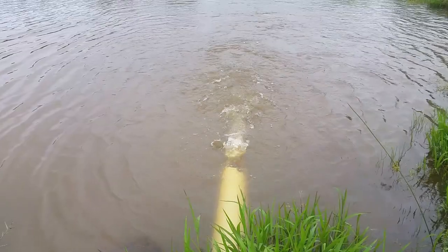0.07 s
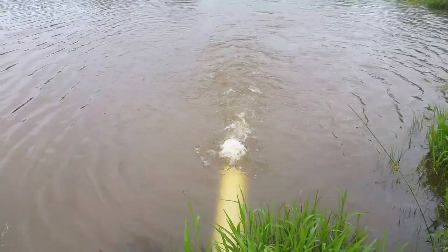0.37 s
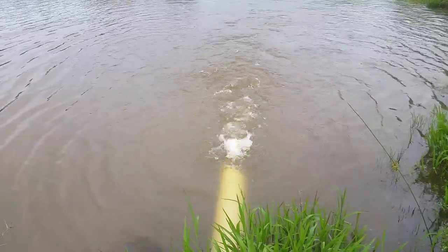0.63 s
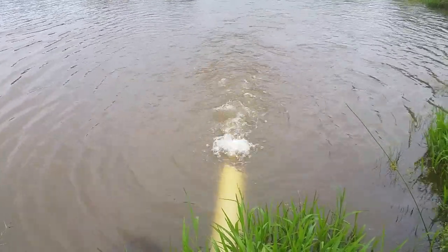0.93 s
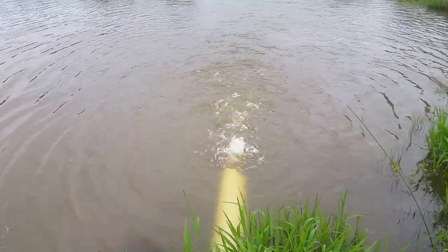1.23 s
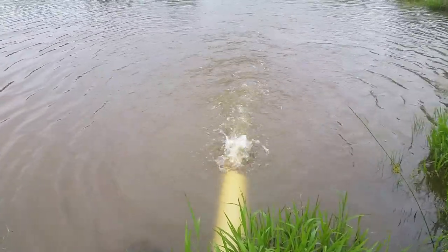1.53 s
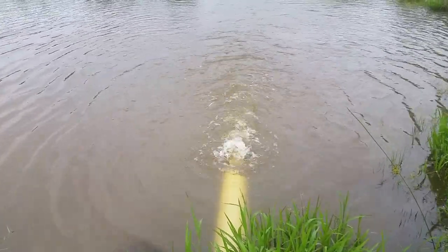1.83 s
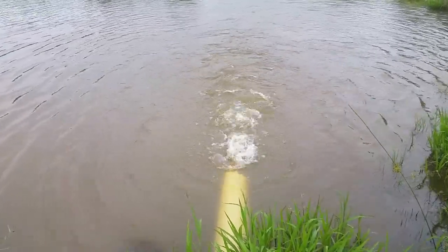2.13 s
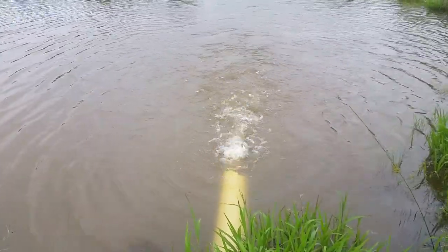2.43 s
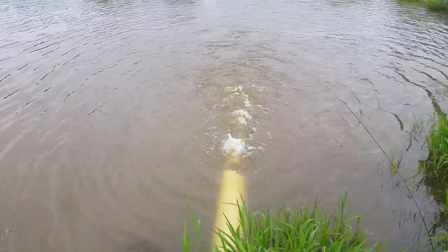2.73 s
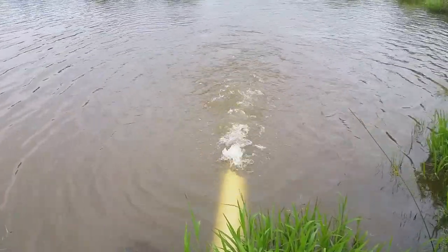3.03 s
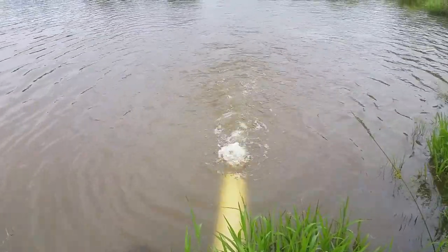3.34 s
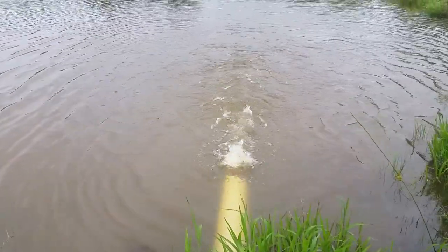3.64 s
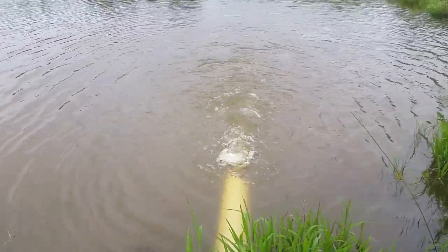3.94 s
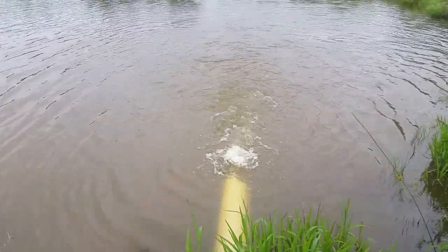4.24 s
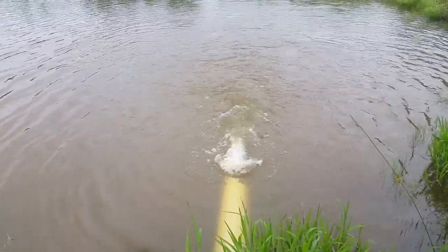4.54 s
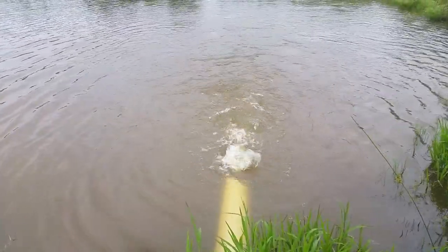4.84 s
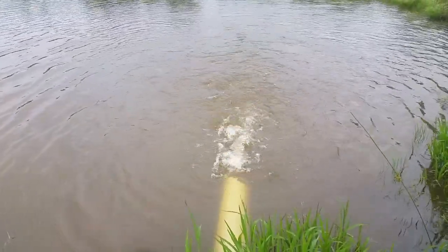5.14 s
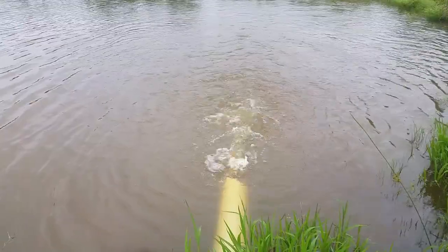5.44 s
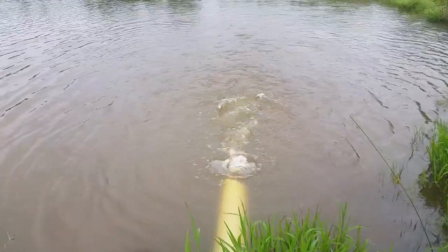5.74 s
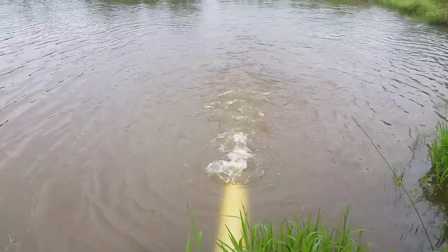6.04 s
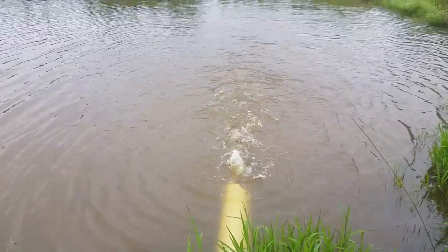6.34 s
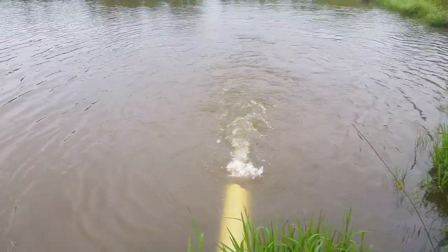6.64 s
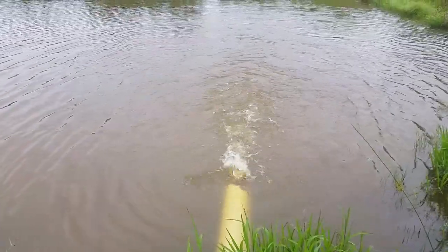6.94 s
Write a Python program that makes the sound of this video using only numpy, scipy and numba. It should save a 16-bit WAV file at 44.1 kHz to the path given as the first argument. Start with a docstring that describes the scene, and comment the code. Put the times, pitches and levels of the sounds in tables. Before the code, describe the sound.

Water and trapped air pour from a half-sunk pipe into a pond, making a continuous churning burble. Low, rounded glugs come a few times a second in uneven clusters, mixed with small plops and slops of falling water. Fine spray patters and foam fizzes above it, with an occasional sharp drip. The microphone is a couple of metres away outdoors, and a light breeze bumps it now and then.

```python
"""Pipe gushing into a pond

Water and trapped air leave a half-sunk pipe a couple of metres from a hand-held microphone.
Air pockets gulp at the mouth, resonating at a pitch that rises as they close. The jet churns up
clouds of ringing bubbles, heaved-up water slops back, spray patters on the surface and foam fizzes.
The bank returns a faint echo, and a light breeze buffets mainly the left microphone port."""
import sys
import numpy as np
from scipy import signal
from scipy.fft import rfft, irfft, next_fast_len
from scipy.io import wavfile
from scipy.ndimage import uniform_filter1d
from numba import njit

SR = 44100
rng = np.random.default_rng(int(sys.argv[2]) if len(sys.argv) > 2 else 0)


def bounce(signal):
    """Save signal as a 16-bit WAV file at the path given by the first command-line argument."""
    frames = np.transpose(np.atleast_2d(signal))
    limited = np.clip(frames, -1, 1)
    pcm = np.round(limited * 32767).astype(np.int16)
    wavfile.write(sys.argv[1], SR, pcm)


N = 316638
TIME = np.arange(N) / SR

# Levels are relative within each table; build and decay are time constants of amplitude.
# air pockets breaking from the mouth: t/s, f/Hz, level/dB, build/s, decay/s, rise/(octave/s)
AIR_POCKETS = [(0.01, 226, -32.5, 0.012, 0.01, 2.7), (0.288, 204, -19.5, 0.0016, 0.01, 16),
               (0.306, 250, -25.5, .006, 0.029, 11), (0.336, 308, -20.5, 0.0017, 0.0036, 8.8),
               (0.517, 186, -20, 0.0032, 0.0033, 13), (0.536, 228, -31, 0.0026, 0.0044, 8.8),
               (0.603, 370, -29, 0.0062, 0.0078, 9.6), (0.703, 116, -27.5, 0.002, 0.01, 4.4),
               (0.732, 192, -24, 0.0066, 0.011, 7.9), (0.756, 200, -21.5, 0.0024, 0.0039, 8),
               (0.784, 284, -25, 0.0029, 0.0069, 11), (0.811, 318, -18, 0.001, 0.0074, 7.1),
               (0.99, 221, -27, 0.0023, 0.002, 10), (1.018, 275, -20, 0.015, 0.0055, 14),
               (1.04, 327, -19, .002, 0.0018, 10), (1.24, 287, -13.5, 0.0025, 0.0041, 6),
               (1.259, 300, -23, 0.0068, .011, 24), (1.306, 440, -31, 0.02, 0.016, 2.2),
               (1.429, 290, -25, 0.0012, 0.013, 2.4), (1.488, 109, -24, 0.0033, 0.0074, 8),
               (1.527, 182.7, -19, 0.019, 0.016, 9.9), (1.68, 135, -28, 0.0063, 0.0083, 5),
               (1.787, 160, -24.5, 0.012, 0.02, 6.8), (1.84, 193, -30, .008, 0.016, 5.9),
               (1.86, 314, -19, 0.00068, 0.014, 7.8), (1.899, 506, -31.5, 0.048, 0.015, 22),
               (2.087, 120, -23.5, 0.0049, .008, 20), (2.102, 198, -24, .003, 0.01, 18),
               (2.151, 229, -23.5, 0.0056, .004, 12), (2.173, 313, -25.5, 0.0064, 0.0073, 9.5),
               (2.433, 205, -22, 0.0034, 0.0033, 11), (2.459, 199, -25, 0.002, 0.0036, 8),
               (2.472, 220, -18, 0.0025, 0.0081, 7.6), (2.49, 259, -27, 0.0035, 0.022, 7.1),
               (2.664, 170, -20, 0.0027, 0.011, 9.6), (2.677, 212, -20.5, 0.0021, 0.0072, 11),
               (2.702, 360, -22, 0.0036, 0.0033, 7), (2.948, 310, -26.5, 0.0083, 0.02, 4),
               (2.977, 291, -21.5, 0.0026, 0.0084, 9), (3.151, 271, -20, 0.0031, 0.0048, 17),
               (3.24, 233, -24, 0.003, 0.0014, 8), (3.314, 130, -30, 0.0033, 0.0065, 8),
               (3.462, 216, -20.5, 0.0042, .007, 16), (3.475, 316, -20, 0.0073, 0.0078, 7.7),
               (3.489, 338, -20, 0.0055, 0.0078, 9.8), (3.76, 232, -23.5, 0.012, 0.016, 9),
               (4.031, 151, -24.5, 0.02, 0.01, 17), (4.073, 220, -18.5, 0.0017, 0.0041, 17),
               (4.094, 342, -31, 0.022, 0.016, 13), (4.236, 140, -32, .001, .003, 5),
               (4.258, 134, -18, .002, .004, 3), (4.319, 261, -18.5, 0.01, 0.012, 5.2),
               (4.347, 292, -21, 0.0089, 0.016, 4.1), (4.538, 196, -20.5, 0.00057, 0.0033, 5),
               (4.555, 188, -26, .001, 0.0033, 5), (4.621, 355, -26, 0.0048, 0.0063, 15),
               (4.645, 268, -27, 0.003, 0.0055, 47), (4.904, 159, -27, 0.0062, 0.0059, 15),
               (4.923, 290, -23.5, 0.0028, 0.022, 9.1), (5.204, 199, -31.5, 0.013, 0.015, 4.9),
               (5.247, 410.4, -33.5, 0.033, 0.033, 28.4), (5.433, 133, -28, 0.0033, 0.026, 16),
               (5.459, 268, -26.5, 0.0075, 0.016, 15.3), (5.768, 57, -22, 0.018, 0.0052, 5),
               (5.8, 169, -16, 0.014, 0.016, 9.3), (5.899, 299, -31, 0.015, 0.027, 9.2),
               (6.064, 147, -26.5, 0.0081, 0.0083, 16), (6.088, 223, -20, 0.0053, 0.004, 18),
               (6.115, 346, -28, 0.0058, 0.0099, 24), (6.234, 140, -31, .002, 0.0033, 5),
               (6.294, 366, -27.5, .003, .009, 3.6), (6.323, 210, -19.5, 0.0068, 0.0074, 15),
               (6.337, 328, -19, 0.01, 0.012, 4.8), (6.507, 210, -25.5, 0.0036, 0.01, 36),
               (6.532, 280, -28.5, 0.015, 0.035, 9), (6.616, 216, -34, 0.0086, 0.0085, 30),
               (6.671, 288, -28.5, 0.017, 0.022, 17), (6.86, 164, -25, 0.007, 0.017, 12),
               (6.874, 267, -23, 0.0015, 0.0073, 8.2)]
# single bubbles that stand out of the splash: t/s, f/Hz, level/dB, decay/s, rise/(octave/s)
SINGLE_BUBBLES = [(0.263, 740, -32.5, 0.0093, -1), (0.339, 785, -26.5, 0.0036, 4),
                  (0.343, 2130, -30, 0.0075, 3), (0.628, 685, -28.5, 0.0041, 1),
                  (0.843, 1080, -34, 0.0073, 8), (1.158, 1370, -27, 0.0015, 8), (1.243, 540, -29, 0.01, 49),
                  (1.296, 843, -29.5, 0.0074, 10.5), (1.44, 630, -37, 0.013, 37),
                  (1.562, 1180, -31.5, 0.0067, 8), (1.655, 2100, -30, .0038, 4),
                  (1.722, 640, -29.5, .005, 15), (1.858, 890, -21.5, 0.0013, 8),
                  (2.04, 1050, -23, 0.0031, 12), (2.256, 680, -30, 0.0067, 5),
                  (2.282, 690, -31, 0.014, 0.5), (2.419, 690, -27, .004, 46),
                  (2.474, 1080, -32.5, 0.0065, -12), (2.511, 730, -29, .003, 29),
                  (2.528, 740, -30, .005, -8), (2.953, 1790, -25, .001, 4), (3.243, 630, -28, 0.005, -2),
                  (3.32, 574, -32.5, 0.014, 15.5), (3.508, 1170, -27, 0.0032, -4),
                  (3.663, 785, -24, 0.002, 8), (3.768, 754, -30.5, 0.007, 12),
                  (3.884, 2100, -32.5, 0.0067, 7), (4.067, 804, -31, 0.012, 3.5),
                  (4.185, 1590, -32.5, .0038, 5), (4.311, 1000, -24, 0.0015, 6),
                  (4.538, 600, -28, 0.0091, 1), (4.622, 705, -29, 0.0061, 2), (4.648, 630, -25, 0.0026, 13),
                  (4.94, 1185, -31, 0.0087, 1), (5.647, 1320, -28, 0.0024, 9),
                  (5.708, 2180, -30.5, 0.0026, 5), (5.712, 3470, -40, 0.0014, 12),
                  (6.098, 1340, -26, 0.0044, 7), (6.255, 870, -34.5, 0.01, 36), (6.405, 590, -28, 0.012, 5),
                  (6.692, 632, -26.5, 0.012, 11.5)]
# slow drift of the jet: t/s, splash level/dB, share of small bubbles/dB, spray level/dB
JET_DRIFT = [(0.0, -50, -4.5, -61.5), (0.45, -49, -5.5, -56), (0.88, -46.5, -3.5, -55),
             (1.3, -47, -2.5, -54), (1.5, -47.5, -3.5, -54), (1.8, -44, -6, -51),
             (2.25, -45.5, -5.5, -56.5), (2.7, -46.5, -4, -54.5), (3.35, -47.5, -5, -53),
             (3.72, -45, -5.5, -50.5), (4.1, -48.5, -5, -56), (4.4, -45, -7.5, -55), (4.58, -50, -7.5, -56),
             (5.12, -43, -3, -50), (5.68, -50.5, -2.5, -56.5), (6.35, -49, -5.5, -56),
             (6.75, -43.5, -3.5, -50.5), (7.18, -49.5, -2.5, -56.5)]
# heaved-up water falling back: t/s, level/dB, decay/s, share of small bubbles/dB
WATER_SLOPS = [(0.346, -42.5, 0.027, -5), (0.46, -47, 0.02, -6), (0.645, -46, 0.052, -3),
               (0.84, -39, 0.018, -15), (1.0, -43, 0.018, -19), (1.154, -47, 0.022, -0.5),
               (1.25, -47, 0.039, -16), (1.33, -41, 0.081, -2.5), (1.66, -47, 0.16, -15),
               (1.875, -38.5, 0.012, -8), (2.16, -44.5, 0.12, -5), (2.27, -45.5, 0.081, -7),
               (2.526, -45.5, 0.048, -8), (2.956, -41, 0.016, -14), (3.025, -41, 0.032, -8),
               (3.325, -56, 0.011, 7.5), (3.42, -55, .02, 9), (3.55, -51.5, 0.16, -1),
               (3.68, -58, .025, -7), (3.801, -40, 0.042, -25), (4.165, -44.5, 0.0085, -7),
               (4.32, -44, 0.008, -4), (4.68, -41.5, 0.039, -5.5), (5.245, -39, 0.022, -11),
               (5.46, -44, 0.036, -19), (5.85, -47, 0.23, -7), (6.115, -44, 0.066, -9),
               (6.69, -40, 0.038, -14)]
# surges of the churning as pockets work their way out: t/s, level/dB
CHURN_SURGES = [(0.28, -45.5), (0.47, -46), (0.54, -47), (0.78, -44), (1.01, -41), (1.24, -45.5),
                (1.44, -44), (1.84, -48), (2.15, -43), (2.45, -45), (2.59, -47.5), (2.67, -40.5),
                (2.97, -47), (3.24, -37.5), (3.47, -55), (3.77, -39), (4.05, -48), (4.31, -44),
                (4.63, -40.5), (4.91, -41.5), (5.47, -39.5), (6.08, -47.5), (6.31, -45), (6.64, -39.5),
                (6.87, -44.5)]
# large drops striking the pond: t/s, level/dB, band centre f/Hz
DROP_IMPACTS = [(0.143, -28.5, 9860), (0.596, -37, 14400), (0.753, -30, 15000), (1.174, -24, 14000),
                (1.273, -32, 13400), (1.821, -23, 14500), (2.545, -34, 13500), (2.698, -27, 14200),
                (3.233, -30, 12000), (3.312, -29, 10940), (3.327, -32, 11000), (3.536, -26, 14900),
                (3.561, -25, 14600), (3.574, -31, 14800), (3.593, -26, 9710), (3.651, -20, 13900),
                (3.711, -31, 14000), (4.314, -26, 9600), (4.449, -30, 9900), (4.68, -28, 14500),
                (5.162, -18, 15000), (5.71, -27.5, 14000), (6.096, -28.5, 9800), (6.217, -27, 13200),
                (6.694, -24, 14500), (7.031, -20.5, 12600)]
# showers of droplets: t/s, level/dB, decay/s
DROPLET_SHOWERS = [(0.14, -54, 0.018), (1.175, -46, 0.022), (3.32, -51, .031), (3.59, -45.5, 0.01)]
# pinhead bubbles left by drops: t/s, f/Hz, level/dB
PINHEAD_BUBBLES = [(0.118, 4510, -34), (0.136, 5360, -28), (0.678, 4970, -30), (0.748, 4720, -36),
                   (1.972, 4600, -35), (2.683, 4920, -33), (3.204, 4870, -34), (3.245, 4620, -34),
                   (4.36, 5000, -31), (4.446, 5500, -28.5), (4.995, 5300, -30), (6.096, 4300, -33),
                   (7.024, 5640, -32)]
# gusts on the microphone: t/s, build and decay/s, left level/dB, right level/dB
PORT_GUSTS = [(1.45, 0.096, -38.5, -57), (1.71, 0.087, -34.5, -43.5), (2.028, 0.14, -37, -45),
              (2.38, 0.031, -38.5, -64), (3.31, 0.01, -59, -25.5), (3.468, 0.011, -64, -29),
              (3.91, 0.25, -66, -38.5), (4.826, 0.017, -56, -30.5), (5.567, 0.17, -32, -56),
              (5.776, 0.034, -24, -35), (6.185, 0.11, -34, -35), (7.134, 0.33, -37.5, -51)]
# balance as the hand turns a little: t/s, left minus right level/dB
MICROPHONE_AIM = [(0.0, 1.5), (0.52, 0), (7.18, 0.5)]
# spectrum of the bubble cloud, rippled by its reflection off the pond: f/Hz, level/dB
SPLASH_SPECTRUM = [(300, 12.5), (480, -10), (640, -2), (900, -8), (1150, -5), (1550, -11.5), (1780, -7),
                   (2100, -7), (2400, -14), (2800, -21.5), (3200, -42), (4500, -73), (7000, -90)]
# spectrum of water shoved aside by a gulp: f/Hz, level/dB
THUMP_SPECTRUM = [(20, -23), (45, -17), (85, 4), (130, 11.5), (200, 2.5), (500, -30)]
# spectrum of the churning under the jet: f/Hz, level/dB
CHURN_SPECTRUM = [(25, -12), (50, 8), (90, 2), (170, 4), (300, 0), (390, 0.5), (480, -18), (700, -85)]
# spectrum of the spray at the two ports: f/Hz, left level/dB, right level/dB
SPRAY_SPECTRUM = [(3100, -17, -27), (3700, -12, -22), (4300, -1, -16.5), (5400, -2, -18), (6100, -13, -22),
                  (7000, -18, -24), (7700, -36, -37), (8600, -16, -19), (9900, -8, -10.5),
                  (10600, -13, -12), (11500, -11, -9), (12600, -14, -14), (13800, -5, -6), (15600, -7, -5)]
# spectrum of eddies on a port: f/Hz, level/dB
BREEZE_SPECTRUM = [(15, -22), (30, -9), (52, -7.5), (90, 0.5), (160, -20.5), (400, -38), (1500, -75)]


def gulps(boom_db=-2.9, shred_db=-11.5, slap_db=-21, thump_db=-3, wobble_s=.0004, shred_octaves=.7):
    """Bubble resonance: each air pocket booms, sheds shreds of air and displaces the water around it."""
    t, hz, db, build, decay, rise = np.transpose(AIR_POCKETS).copy()
    phase, shred_phase, spread, late = rng.random((len(t), 4)).T.copy()
    boom = bubbles(t, hz, undb(db + boom_db), build, decay, rise, phase)
    # a pocket wobbles in pitch and level as it rings
    boom = np.interp(TIME + wobble_s * flutter(120), TIME, boom) * undb(1.6 * flutter(130))
    shred_t = t + (late - .5) * decay
    shred_hz = hz * 2 ** (shred_octaves * (2 * spread - 1))
    shreds = bubbles(shred_t, shred_hz, undb(db + shred_db), build / 2, decay / 2, rise, shred_phase)
    slap = colour(boom * noise(SPLASH_SPECTRUM), [(2500, -6.5), (7000, -30)])
    # the shove follows the size of the boom, so sudden gulps thump hardest
    thump = colour(np.abs(boom), THUMP_SPECTRUM)
    return boom + colour(shreds, CHURN_SPECTRUM) + undb(slap_db) * slap + undb(thump_db) * thump


def churn(steady_db=-55, stir_db=6, rumble_db=-7):
    """Turbulent excitation: large bubbles burble under the jet, stirred harder around the gulps."""
    t, db = np.transpose(CHURN_SURGES)
    power = undb(steady_db) ** 2 + swell_power(t, db + stir_db, build_s=.07, decay_s=.048)
    burble = cloud(1000, low_hz=87.6, high_hz=447, cycles=1.4, build_share=.3, rise=14.5, scatter_db=2.4)
    water = unit(colour(burble, CHURN_SPECTRUM)) + undb(rumble_db) * noise(CHURN_SPECTRUM)
    return np.sqrt(power) * unit(water)


def plops(gain_db=-2.5, build_s=.00058, smack_db=-10):
    """Damped resonance: bubbles bursting near the surface ring, with a wet smack in the same envelope."""
    t, hz, db, decay, rise = np.transpose(SINGLE_BUBBLES).copy()
    rings = bubbles(t, hz, undb(db + gain_db), np.full(len(t), build_s), decay, rise, rng.random(len(t)))
    smack = np.abs(signal.hilbert(rings)) * noise(SPLASH_SPECTRUM)
    return rings + undb(smack_db) * smack


def splash(splash_db, small_db, slop_power, small_slop_power, rush_db=-4.5, fine_db=.5, flutter_db=1.48):
    """Incoherent addition: jet and slops sum in power to drive bubble clouds over a faint rush."""
    coarse = cloud(7500, low_hz=440, high_hz=1450, cycles=5.2, build_share=.2, rise=10, scatter_db=2.1)
    fine = cloud(10000, low_hz=1450, high_hz=2940, cycles=5.8, build_share=.12, rise=10, scatter_db=2.7)
    coarse, fine = (unit(colour(x, SPLASH_SPECTRUM)) for x in (coarse, fine))
    rush = undb(rush_db) * noise(SPLASH_SPECTRUM)
    coarse_gain = np.sqrt(undb(splash_db) ** 2 + slop_power)
    fine_gain = undb(fine_db) * np.sqrt(undb(splash_db + small_db) ** 2 + small_slop_power)
    water = coarse_gain * (coarse + rush) + fine_gain * fine
    return undb(flutter_db * flutter(45)) * water


def slops(build_s=.029):
    """Transient excitation: water falling back gives a surge of power to coarse and to fine bubbles."""
    t, db, decay, small_db = np.transpose(WATER_SLOPS)
    return swell_power(t, db, build_s, decay), swell_power(t, db + small_db, build_s, decay)


def drops(decay_s=.0016, width_octaves=.3, body=.09, pan_db=2.5):
    """Impact radiation: each large drop gives a short bright crack over a weak broadband body."""
    out, size = np.zeros((2, N)), 1024
    envelope = np.exp(-np.arange(size) / SR / decay_s)
    bin_hz = np.maximum(np.fft.rfftfreq(size, 1 / SR), 1)
    port_hz, left_db, _ = np.transpose(SPRAY_SPECTRUM)
    port_gain = undb(np.interp(bin_hz, port_hz, left_db))
    side_db = np.array([[pan_db], [-pan_db]]) / 2
    for t, db, hz in DROP_IMPACTS:
        band = body + np.exp(-.5 * (np.log2(bin_hz / hz) / width_octaves) ** 2)
        burst = np.roll(rng.standard_normal((2, size)) * envelope, 32, axis=1)
        crack = irfft(rfft(burst) * band * port_gain)
        start = int(t * SR)
        out[:, start:start + size] += crack / np.abs(crack).max() * undb(db + side_db)
    return out


def spray_level(steady_db, slop_power, slop_share_db=-10):
    """Addition of powers: the spray of jet, slops and showers combines into one level in dB."""
    t, db, decay = np.transpose(DROPLET_SHOWERS)
    shower_power = swell_power(t, db, build_s=.031, decay_s=decay)
    return 10 * np.log10(undb(steady_db) ** 2 + undb(slop_share_db) ** 2 * slop_power + shower_power)


def patter(spray_db, count=9000, scatter_db=3.2, shared=.91, flutter_db=2.5, gain_db=1.5):
    """Shot noise: tiny droplets land at random; some just click, others tick at a pitch of their own."""
    clicks = np.zeros((3, N))  # left, right, common to both
    for row in clicks:
        size = undb(scatter_db * np.minimum(rng.exponential(size=count), 6))
        sign = rng.choice([-1, 1], count)
        np.add.at(row, rng.integers(0, N, count), size * sign)
    ticks = np.array([
        cloud(2500, low_hz=8500, high_hz=16000, cycles=6, build_share=.1, rise=10, scatter_db=4)
        for _ in clicks])
    landings = unit(clicks) + unit(ticks) / 2
    droplets = at_ports(landings[:2] + shared * landings[2])
    droplets = colour(droplets, [(3000, 4.5), (6000, 4), (9000, 6), (15000, .5)])
    return undb(spray_db + gain_db + flutter_db * flutter(90)) * unit(droplets)


def tinks(decay_s=.0011, octaves_per_s=12.0):
    """Resonance varies inversely with radius: pinhead bubbles left by drops ring high and briefly."""
    t, hz, db = np.transpose(PINHEAD_BUBBLES).copy()
    decay, rise = np.full(len(t), decay_s), np.full(len(t), octaves_per_s)
    rings = bubbles(t, hz, undb(db), decay / 2, decay, rise, rng.random(len(t)))
    return at_ports([rings, rings])


def foam(spray_db, fizz_db=-47, tinkle_db=-62, follow=.3, shared=.71, flutter_db=1):
    """Many tiny sources merge into noise: foam fizzes and tinkles, surging a little with the spray."""
    hiss = rng.standard_normal((3, N))
    common = shared * colour(hiss[2], [(9000, -4), (13000, -42)])
    fizz = colour(at_ports(hiss[:2] + common), [(3000, 1), (6500, 0), (9000, -10), (15000, 3.5)])
    tinkle = cloud(900, low_hz=3690, high_hz=6900, cycles=11, build_share=.044, rise=5, scatter_db=2.8)
    froth = undb(fizz_db) * unit(fizz) + undb(tinkle_db) * unit(at_ports([tinkle, tinkle]))
    surge_db = follow * (spray_db - np.mean(spray_db)) + flutter_db * flutter(40)
    return undb(surge_db) * froth


def bank_echo(x, echo_db=-16.5, decay_s=.012):
    """Diffuse scattering: the grassy bank returns a faint, dull echo, different at each port."""
    t = TIME[:8192]
    response = rng.standard_normal((2, len(t))) * np.exp(-t / decay_s)
    response /= np.sqrt(np.sum(response ** 2, axis=1, keepdims=True))
    dull = colour(x, [(1350, -1.5), (1700, -42)])
    return undb(echo_db) * signal.fftconvolve(dull[None], response, axes=1)[:, :N]


def breeze(calm_db=-62):
    """Turbulent pressure: eddies thump on each port independently, mostly the left."""
    t, length, *ports_db = np.transpose(PORT_GUSTS)
    gust_power = np.array([swell_power(t, db, length, length) for db in ports_db])
    return noise(BREEZE_SPECTRUM, (2, N)) * np.sqrt(undb(calm_db) ** 2 + gust_power)


@njit
def bubbles(times, hz, size, build, decay, rise, phase):
    """Damped oscillators: each bubble swells, then rings out, gliding by `rise` octaves a second."""
    out = np.zeros(N)
    for k in range(len(times)):
        first = max(0, int((times[k] - 5 * build[k]) * SR))
        last = min(N, int((times[k] + 5 * decay[k]) * SR))
        climb = rise[k] * np.log(2)
        for i in range(first, last):
            t = i / SR - times[k]
            cycles = hz[k] * (np.exp(climb * t) - 1) / climb
            envelope = np.exp(min(t / build[k], -t / decay[k]))
            out[i] += size[k] * envelope * np.sin(2 * np.pi * (cycles + phase[k]))
    return out


def cloud(count, low_hz, high_hz, cycles, build_share, rise, scatter_db):
    """Random superposition: bubbles that each ring for a few cycles give equal power per Hz."""
    when, pitch, loudness, ring, climb, phase = rng.random((count, 6)).T.copy()
    hz = low_hz * (high_hz / low_hz) ** pitch
    size = hz * undb(-scatter_db * np.log(1 - .985 * loudness))
    decay = cycles * (.5 + ring) / hz
    return bubbles(when * N / SR, hz, size, build_share * decay, decay, rise * (.5 + climb), phase)


def swell_power(times, db, build_s, decay_s):
    """Exponential growth and decay: the summed power of swells that each peak at their own time."""
    t = TIME[::32]
    power = sum((undb(peak) * np.exp(np.minimum((t - at) / build, (at - t) / decay))) ** 2
                for at, peak, build, decay in zip(*np.broadcast_arrays(times, db, build_s, decay_s)))
    return np.interp(TIME, t, power)


def at_ports(x):
    """Frequency response: each port colours the treble in its own way."""
    hz, *ports_db = np.transpose([(2020, -24.5, -51)] + list(SPRAY_SPECTRUM))
    return np.array([colour(side, list(zip(hz, db))) for side, db in zip(x, ports_db)])


def delay_left(x, lag_s=.000018):
    """Path difference: the spray falls nearer the right port and reaches the left one later."""
    phase_shift = np.exp(-2j * np.pi * np.fft.rfftfreq(N, 1 / SR) * lag_s)
    return np.array([irfft(rfft(x[0]) * phase_shift, N), x[1]])


def colour(x, spectrum):
    """Linear filtering by a spectrum of (f/Hz, level/dB) points, joined in log frequency."""
    hz, db = np.transpose(spectrum)
    size = next_fast_len(N + 4096)
    bin_hz = np.maximum(np.fft.rfftfreq(size, 1 / SR), 1)
    gain = undb(np.interp(np.log(bin_hz), np.log(hz), db))
    return irfft(rfft(x, size) * gain, size)[..., :N]


def noise(spectrum, shape=N):
    """Spectral shaping of Gaussian noise, at rms 1."""
    return unit(colour(rng.standard_normal(shape), spectrum))


def flutter(rate_hz):
    """Random modulation: values held for 1 / rate_hz seconds and smoothed twice, at rms 1."""
    hold = int(SR / rate_hz)
    steps = rng.standard_normal(4096)[(TIME * rate_hz).astype(int) % 4096]
    return unit(uniform_filter1d(uniform_filter1d(steps, hold), hold))


def curves(table):
    """Linear interpolation of each column against the first, t/s."""
    t, *columns = np.transpose(table)
    return [np.interp(TIME, t, column) for column in columns]


def undb(db):
    """Amplitude ratio of a level in decibels."""
    return 10 ** (np.asarray(db) / 20)


def unit(x):
    """Normalisation to rms 1."""
    return x / np.sqrt(np.mean(x ** 2))


def scene():
    """Superposition: the pipe mouth straight ahead, its echo, the spray around it and the breeze."""
    splash_db, small_db, steady_spray_db = curves(JET_DRIFT)
    pan_db, = curves(MICROPHONE_AIM)
    slop_power, small_slop_power = slops()
    spray_db = spray_level(steady_spray_db, slop_power)
    mouth = gulps() + churn() + plops() + splash(splash_db, small_db, slop_power, small_slop_power)
    direct = mouth * undb(np.array([pan_db, -pan_db]) / 2)
    echo = bank_echo(mouth)
    spray = delay_left(patter(spray_db) + foam(spray_db))
    return direct + echo + spray + drops() + tinks() + breeze()


def record(dry):
    """Band limiting: a steep low-pass filter removes the treble above 15.7 kHz."""
    return signal.sosfilt(signal.ellip(10, .2, 80, 15700, fs=SR, output="sos"), dry)


dry = scene()
out = record(dry)
bounce(out)
```